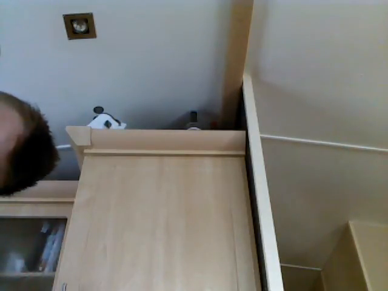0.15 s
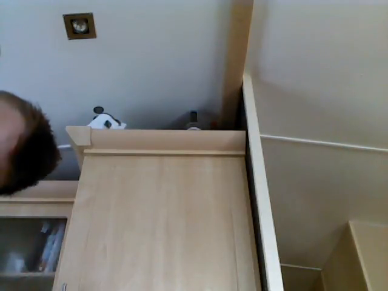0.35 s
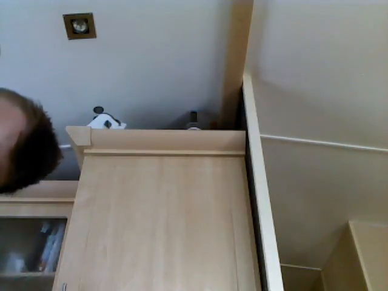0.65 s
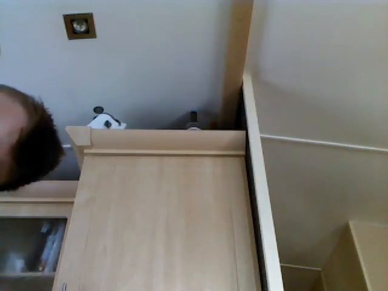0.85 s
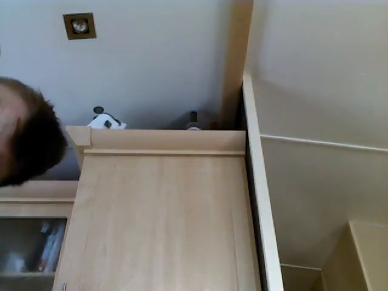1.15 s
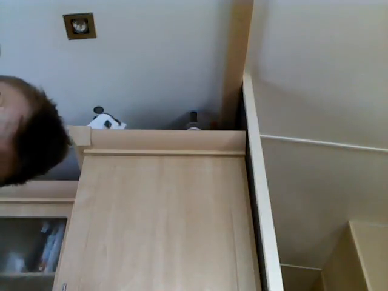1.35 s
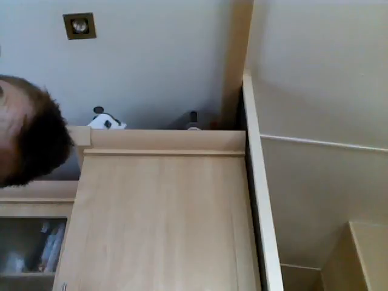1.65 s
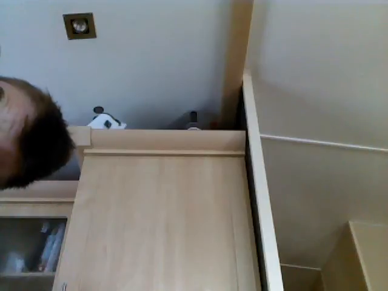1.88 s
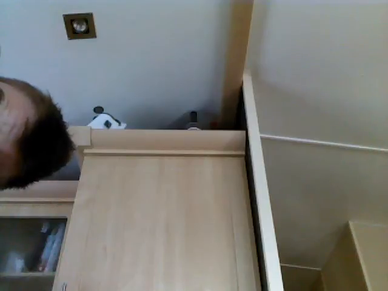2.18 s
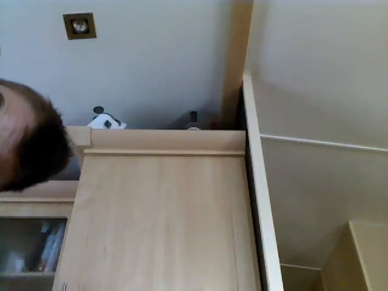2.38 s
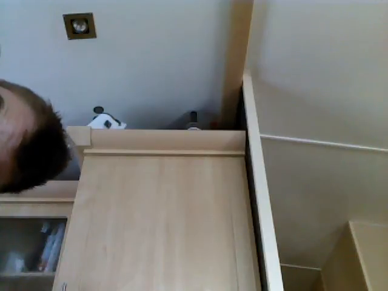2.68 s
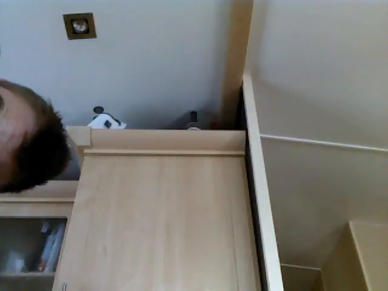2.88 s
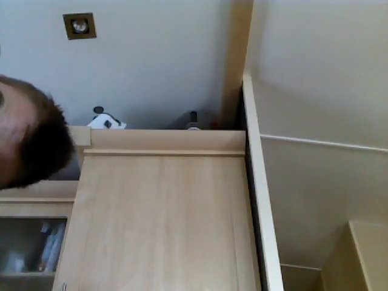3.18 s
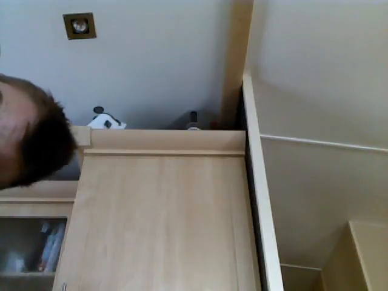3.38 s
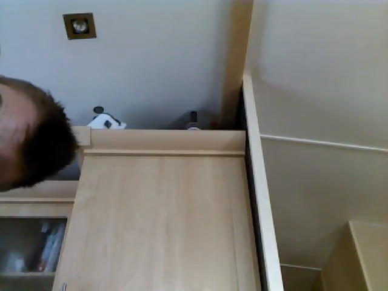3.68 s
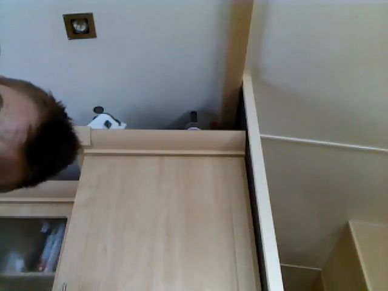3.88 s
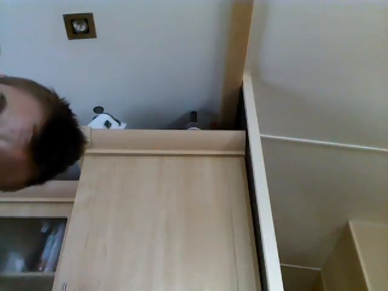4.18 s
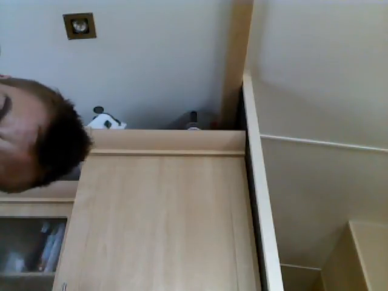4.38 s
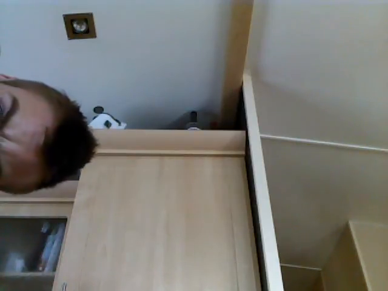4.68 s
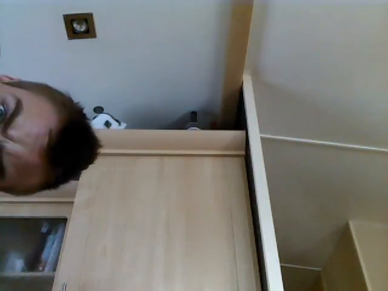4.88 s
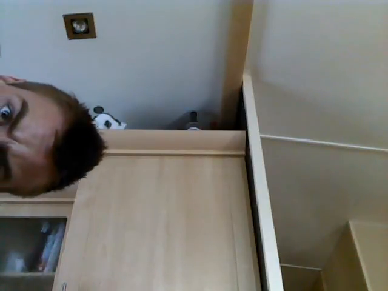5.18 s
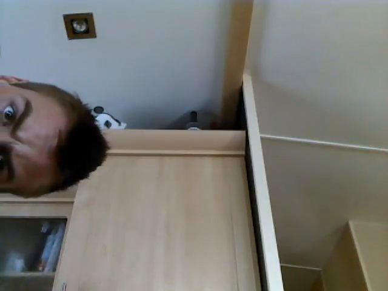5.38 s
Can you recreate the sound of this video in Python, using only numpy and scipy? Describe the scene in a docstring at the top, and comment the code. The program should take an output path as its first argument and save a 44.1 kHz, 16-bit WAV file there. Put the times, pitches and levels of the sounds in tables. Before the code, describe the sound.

A laptop fan hums and rushes under a fizzing, fluttering high electronic whine, with a single hard knock on the desk near the end.

```python
"""Portable computer in a quiet room

The fan rushes and hums, as filtered noise plus tones of its shaft; steady sines add throbs and whines.
The disc's arm scrapes, as noise bursts through resonances. The power parts on the board whine in short
bursts whenever the processor dozes between picture frames, over an irregular crackle that never stops.
One knock on the desk rings through the case as decaying modes. A built-in microphone hears it all."""
import sys
import numpy as np
from scipy import signal
from scipy.fft import rfft, irfft, next_fast_len
from scipy.io import wavfile
from scipy.ndimage import uniform_filter1d, map_coordinates

SR = 44100
rng = np.random.default_rng(int(sys.argv[2]) if len(sys.argv) > 2 else 0)


def put_to_file(sound):
    """Save the sound as 16-bit audio at rate SR, in the file named by the first command-line argument."""
    columns = np.atleast_2d(sound).T  # one column per channel
    safe = np.clip(columns, -1, 1)
    whole_steps = np.round(safe * 32767)
    wavfile.write(sys.argv[1], SR, whole_steps.astype(np.int16))


N = 244314
T = np.arange(N) / SR


def amp(db):
    """Decibels to amplitude."""
    return 10 ** (np.asarray(db) / 20)


def unit(x):
    """Scale to rms 1."""
    return x / np.sqrt(np.mean(x ** 2) + 1e-20)


def wobble(rate):
    """A smooth random curve, rate knots a second."""
    knots = rng.standard_normal(int(N * rate / SR) + 4)
    return map_coordinates(knots, [T * rate])


def filtered(x, response):
    """x times a complex response of frequency."""
    m = next_fast_len(N + SR // 2)
    return irfft(rfft(x, m) * response(np.fft.rfftfreq(m, 1 / SR)), m)[:N]


def modes(table):
    """Complex response of some resonances; like polarities cancel between neighbours."""
    def response(f):
        return sum(sign * amp(db) * 1j * f * width / (hz * hz - f * f + 1j * f * width)
                   for hz, width, db, sign in table)
    return response


def gate(start_s, length_ms, gain, edge_ms):
    """Gain that is on during each span, with soft edges."""
    steps = np.zeros(N + SR)
    np.add.at(steps, np.round(start_s * SR).astype(int), gain)
    np.add.at(steps, np.round((start_s + length_ms / 1000) * SR).astype(int), -gain)
    return uniform_filter1d(np.cumsum(steps)[:N], max(1, round(edge_ms * SR / 1000)))


def crackle(spread_db):
    """Dense current spikes of uneven size, rms 1."""
    sizes = amp(spread_db * rng.standard_normal(N))
    return unit(rng.standard_normal(N) * sizes)


# two low throbs, the disc spindle and two whines: pitch_hz, level_db (rms)
STEADY_TONES = [(26.9, -48.0), (37.7, -46.5), (90.2, -52.0), (1619.0, -65.0), (2158.7, -65.5)]


def steady_tones():
    """Parts that turn or hum at a fixed pitch, each a plain sine."""
    return sum(np.sqrt(2) * amp(db) * np.sin(2 * np.pi * hz * T) for hz, db in STEADY_TONES)


FAN_HZ = 53.0  # shaft speed
# tones of the turning fan: multiple_of_shaft_speed, level_db (rms, before it wavers)
FAN_TONES = [(1, -53.0), (9, -58.0), (13, -52.5), (16, -58.0), (17, -57.0), (18, -60.0), (20, -58.0),
             (21, -54.5), (22, -60.0), (23, -61.0), (24, -58.0), (25, -61.0), (26, -63.0), (28, -66.0),
             (36, -63.0), (38, -68.0), (39, -71.0), (50, -68.0), (51, -69.0), (52, -69.0), (53, -70.0),
             (54, -69.0)]
# spectral shape of air rush and case rumble: pitch_hz, relative_level_db (per Hz)
RUSH_SHAPE = [(12, -8), (25, -1.5), (60, -10), (110, -11.5), (390, -12.5), (570, -8.5), (800, -15.5),
              (1200, -13), (1530, -19), (1820, -17), (2050, -23.5), (2450, -26.5), (2900, -25), (3250, -25),
              (3600, -20.5), (3950, -25), (6000, -28.5), (11500, -86)]


def fan():
    """Air rush as shaped noise, with tones locked to a shaft that wavers a little."""
    hz, db = np.transpose(RUSH_SHAPE)

    def rush_response(f):
        return amp(np.interp(np.log(f + 1), np.log(hz + 1), db))
    rush = unit(filtered(rng.standard_normal(N), rush_response))
    rush_level = amp(-36.5 + 0.076 * wobble(4.57))
    shaft_angle = 2 * np.pi * (FAN_HZ * T + 0.0041 * wobble(3.046))
    tones = np.zeros(N)
    for multiple, level_db in FAN_TONES:
        level = np.sqrt(2) * amp(level_db + 1.2 * wobble(4.07))
        tones += level * np.sin(multiple * shaft_angle + rng.uniform(0, 2 * np.pi))
    return rush_level * rush + tones


# moves and stops of the head arm, in a flurry about once a second: time_s, drive_level_db
ARM_MOVES = [(1.6176, -18.5), (1.643, -23), (1.662, -25), (1.6776, -19), (1.733, -20), (1.744, -27),
             (2.805, -22), (2.813, -28), (2.835, -20.5), (2.857, -22), (2.8994, -23), (2.913, -26),
             (3.973, -21.5), (3.976, -25), (3.9877, -21), (4.0313, -20), (4.0347, -25), (4.0447, -26),
             (5.1074, -21), (5.1206, -21), (5.1687, -22), (5.1747, -29), (5.1824, -22)]
# what the arm and disc housing ring with: pitch_hz, width_hz, relative_level_db, signed_gain
ARM_MODES = [(1180, 1180, 1.5, 0.81), (1780, 410, 1.5, -1.37), (3250, 4400, -12.5, 1),
             (4700, 270, 0.5, -1.2), (6030, 640, 1.5, 0.97), (7680, 490, 4.5, -1.1)]


def disc():
    """Each move of the arm is a short scrape through its resonances; the housing murmurs on."""
    scrapes, t = np.zeros(N), T[:2600]
    for time_s, db in ARM_MOVES:
        scrape = amp(db - 60 * t / 0.024) * (1 - np.exp(-t / 0.00088))
        murmur = amp(db - 14.5 - 60 * t / 0.16)
        burst = (scrape + murmur) * rng.standard_normal(len(t))
        # the scrape swells from just before the listed time
        scrapes[round((time_s - .0008) * SR):][:len(t)] += burst
    return filtered(scrapes, modes(ARM_MODES))


# contacts of the one knock: start_s, level_db (relative), hardness (tilt in units of 6 dB per octave)
CONTACTS = [(4.7426, -6, 1.6), (4.74445, 0, 0)]
# desk and case modes: pitch_hz, relative_level_db, t60_s, rise_s, polarity at the struck spot
DESK_MODES = [(53.5, -25.5, .81, .004, 1), (58.4, -7, .149, .04, -1), (102, -20.7, .1, .0005, -1),
              (204, -10.5, .094, .007, 1), (356.5, 5.8, .029, .03, -1), (455, -5, .051, .0003, 1),
              (483.3, 3.1, .069, .03, 1), (537, 12.7, .031, .03, 1), (566.6, 1.7, .058, .03, 1),
              (645, -10.5, .046, .0003, -1), (720, -22, .04, .001, 1), (870, -27, .05, .001, 1),
              (1070, -21, .03, .001, -1), (1380, -25, .04, .001, 1), (1900, -30, .02, .0006, 1),
              (2400, -20, .018, .0006, -1), (3250, -40, .015, .0006, 1), (4600, -33, .015, .0004, -1)]


def knock():
    """Each contact rings desk and case and adds a noisy crack; a hard one favours the high modes."""
    out, t = np.zeros(N + SR), T[:SR // 2]
    for start_s, level_db, hardness in CONTACTS:
        ring = np.zeros(len(t))
        for hz, db, t60, rise, sign in DESK_MODES:
            tilt_db = 6 * hardness * np.log2(hz / 1500)
            envelope = amp(db + tilt_db - 60 * t / t60) * (1 - np.exp(-t / rise))
            ring += sign * envelope * np.sin(2 * np.pi * hz * t)
        crack = amp(-12 - 60 * t / 0.018) * uniform_filter1d(rng.standard_normal(len(t)), size=11)
        out[round(start_s * SR):][:len(t)] += amp(level_db) * (ring + crack)
    return out[:N]


def room(x, t60, wet_db):
    """A short dull tail from the walls: smoothed decaying noise, 400 samples behind."""
    noise = uniform_filter1d(rng.standard_normal(SR // 3), size=9)
    tail = noise * amp(-60 * T[:SR // 3] / t60)
    delayed = np.pad(x, (400, 0))
    return x + amp(wet_db) * signal.fftconvolve(delayed, tail / np.linalg.norm(tail))[:N]


# crackle levels here drive the board, ahead of its resonances
FRAME_HZ, FIRST_FRAME_S = 29.845, .01405  # pictures arrive from the camera
WAKE_HZ, FIRST_WAKE_S = 62.5, .0108  # scheduler clock; a waiting picture is taken up at its next beat
WORK_MS, WORK_SPREAD_MS = 11.6, 3.9  # flat-out work on a picture, plus or minus
SETTLE_MS, SETTLE_SPREAD_MS = 15.8, 2.6  # earliest doze after waking, mean extra wait
SETTLE_DB, SETTLE_SPREAD_DB = -37.75, 2.5  # crackle while winding down, plus or minus
NUDGE_SHARE, NUDGE_MS, NUDGE_DB = .4, 5.6, -32.5  # dozes a small task breaks: share, mean length, crackle
CHORE_FIRST_S, CHORE_EVERY_S, CHORE_MS = .897, 1.141, 143  # a recurring chore forbids dozing
CHORE_DB, PATCHY_DB = -45.5, 4  # chore crackle; how unevenly sleepless stretches crackle
# frames in which other work leaves no room for a doze: within_s (any moment inside the frame),
# crackle_drive_db
SLEEPLESS_FRAMES = [(.605, -47), (1.42, -39), (1.98, -31.5), (2.49, -54), (2.525, -35), (2.745, -31.5),
                    (2.825, -43), (3.9, -57), (4.12, -42), (4.155, -35.5), (4.19, -33), (4.265, -37),
                    (4.6, -33.5), (4.665, -41), (4.73, -44), (4.825, -36), (5.035, -29), (5.26, -32),
                    (5.34, -53)]


def schedule():
    """When the processor dozes (0-1), and the extra crackle as it winds down or is kept from dozing."""
    arrive = FIRST_FRAME_S + np.arange(-1, N / SR * FRAME_HZ + 1) / FRAME_HZ
    beats = FIRST_WAKE_S + np.ceil((arrive - FIRST_WAKE_S) * WAKE_HZ) / WAKE_HZ
    wake, frame_ms = beats[:-1], 1000 * np.diff(beats)
    chance = rng.uniform(size=(len(wake), 6))

    def span(from_ms, to_ms, gain, edge_ms):
        return gate(wake + from_ms / 1000, to_ms - from_ms, gain, edge_ms)

    # times after each waking
    done_ms = WORK_MS + WORK_SPREAD_MS * (2 * chance[:, 0] - 1)
    extra_ms = -SETTLE_SPREAD_MS * np.log(1 - chance[:, 1])
    doze_ms = np.minimum(SETTLE_MS + extra_ms, frame_ms - 4)
    done_ms = np.minimum(done_ms, doze_ms)

    within_s, crackle_db = np.transpose(SLEEPLESS_FRAMES)
    fretting = np.zeros(len(wake))
    fretting[np.searchsorted(wake, within_s) - 1] = amp(crackle_db)
    free = 1.0 * (fretting == 0)

    chore_s = np.arange(CHORE_FIRST_S, N / SR, CHORE_EVERY_S)
    chore = gate(chore_s, CHORE_MS, 1.0, edge_ms=1.3)
    nudge_ms = doze_ms + chance[:, 2] * (frame_ms - doze_ms)
    # cut short where the frame ends
    nudge_end_ms = np.minimum(nudge_ms + 2 * NUDGE_MS * chance[:, 3], frame_ms)
    nudge = span(nudge_ms, nudge_end_ms, free * (chance[:, 4] < NUDGE_SHARE), edge_ms=1.3)
    idle = span(doze_ms, frame_ms, free, edge_ms=1.3)

    settle_level = amp(SETTLE_DB + SETTLE_SPREAD_DB * (2 * chance[:, 5] - 1))
    settling = span(done_ms, doze_ms, free * settle_level, edge_ms=2.4)
    patchy = amp(PATCHY_DB * wobble(150))
    sleepless = span(np.full_like(wake, SETTLE_MS), frame_ms, fretting, edge_ms=3.5)
    sleepless = sleepless + amp(CHORE_DB) * chore * idle
    stirring = settling + amp(NUDGE_DB) * nudge * (1 - chore) + patchy * sleepless
    dozing = np.clip(idle - nudge, 0, 1) * (1 - chore)
    return dozing, stirring


TIMER_HZ, BUS_HZ = 999.95, 8000.0
# resonances of the board: pitch_hz, width_hz, relative_level_db, polarity
BOARD_MODES = [(4580, 270, -3.3, 1), (5240, 450, -3.0, -1), (5800, 280, -7.5, 1), (6010, 200, -3.1, 1),
               (6830, 240, -6.1, -1), (7280, 340, -5.7, 1), (7800, 250, .7, -1), (8420, 200, -4.9, 1),
               (8890, 250, -2.2, -1), (9750, 730, -5.6, 1), (10550, 290, -16.1, -1), (11030, 130, -7.6, -1),
               (11490, 120, -23.6, 1)]
# timer-tick overtones the board radiates, from the fourth on: level_db (peak, before it flickers)
TICK_OVERTONES = [-70, -39, -44.5, -51, -66, -40.5, -48.5, -72]


def power_parts():
    """Current steps shake the board: a clocked whine in dozes, over an irregular crackle that never stops."""
    dozing, stirring = schedule()
    restless = amp(-37.5 + 1.1 * wobble(120))  # an uneven floor that never stops
    loose_level = (restless + stirring + amp(-36.5) * dozing) * amp(1.5 * wobble(500))
    loose = loose_level * crackle(spread_db=2.5)
    # the timer ticks a few microseconds early or late
    tick_angle = 2 * np.pi * TIMER_HZ * (T + 8e-6 * wobble(26))
    ticks = sum(amp(db + 1.5 * wobble(250)) * np.cos(overtone * tick_angle)
                for overtone, db in enumerate(TICK_OVERTONES, start=4))
    # now and then other work partly hides the bus clock for a millisecond or two
    hidden = 1 - 0.45 * np.clip(3 * (wobble(450) - 1.1), 0, 1)
    bus = hidden * amp(-32.0 + 1.1 * wobble(300)) * np.sin(2 * np.pi * BUS_HZ * T)
    coupling = amp(5.0)  # from current to sound
    return coupling * filtered(loose, modes(BOARD_MODES)) + dozing * (ticks + bus)


def scene():
    """Sum of all sources; only the knock gets the room tail."""
    background = steady_tones() + fan() + disc()
    knocking = room(knock(), t60=0.082, wet_db=-21.0)
    return (background + knocking + power_parts())[None]


NOTCH_HZ, TOP_HZ = 9434, 11600


def record(dry):
    """The microphone port has a notch; nothing is kept above the band limit."""
    def port(f):
        detune = NOTCH_HZ ** 2 - f * f
        notch = (detune + 1j * f * 30) / (detune + 1j * f * 790)
        return notch * (f < TOP_HZ)
    return filtered(dry[0], port)[None]


dry = scene()
out = record(dry)
put_to_file(out)
```